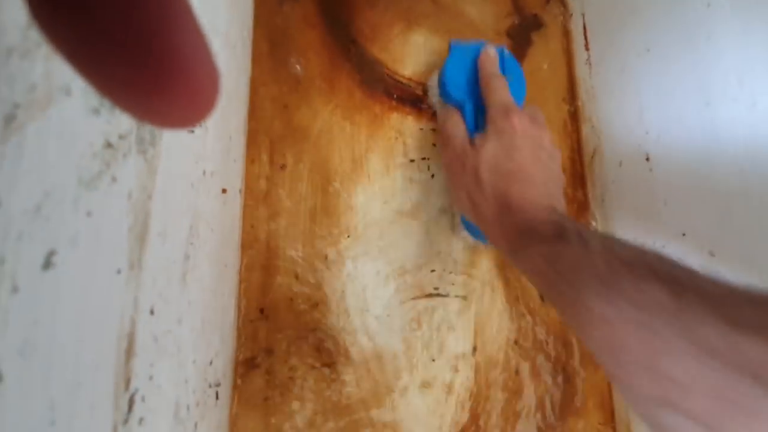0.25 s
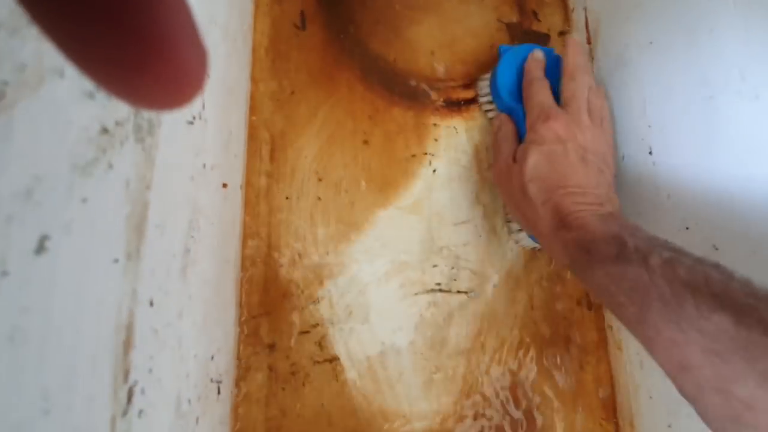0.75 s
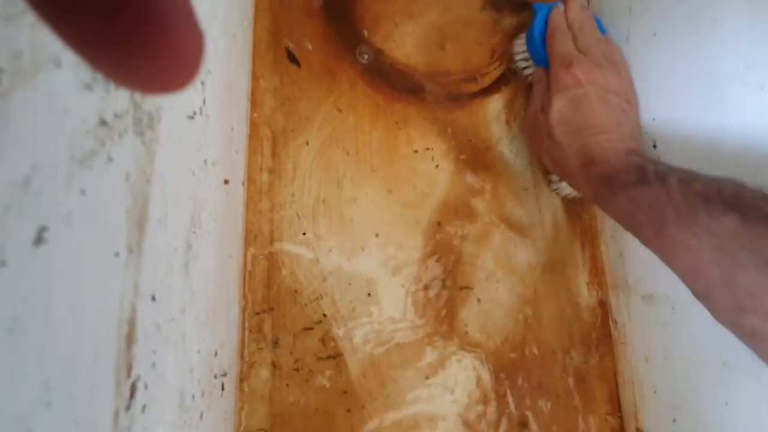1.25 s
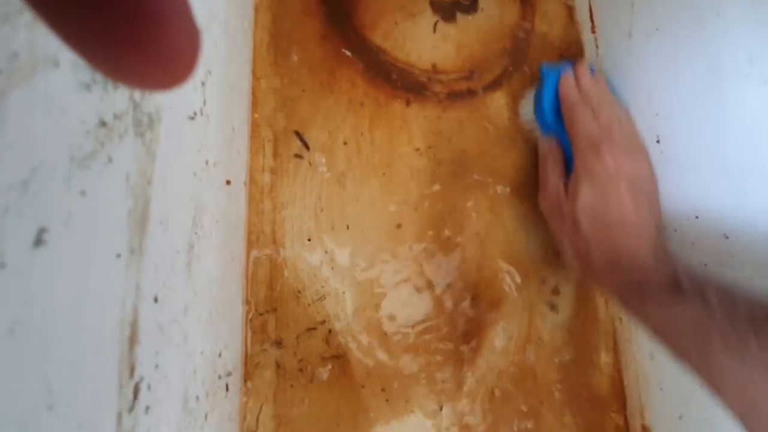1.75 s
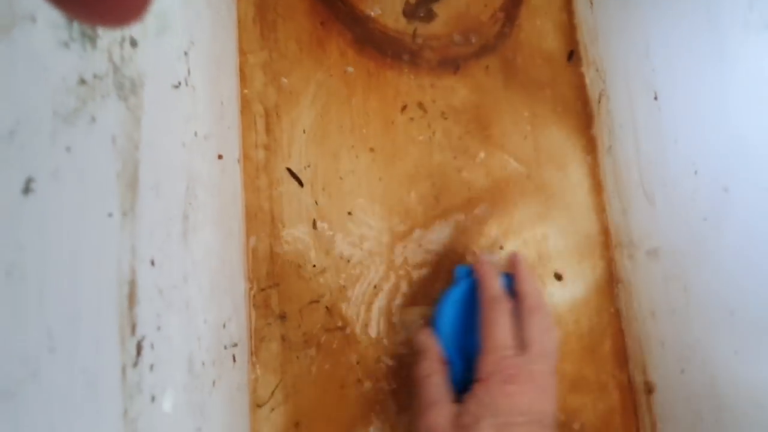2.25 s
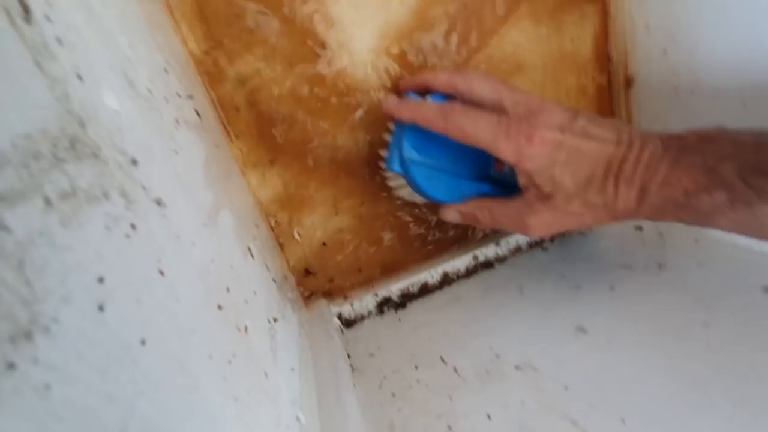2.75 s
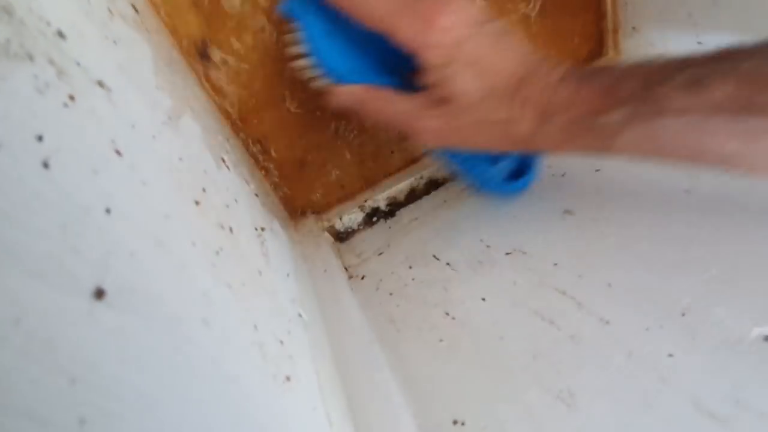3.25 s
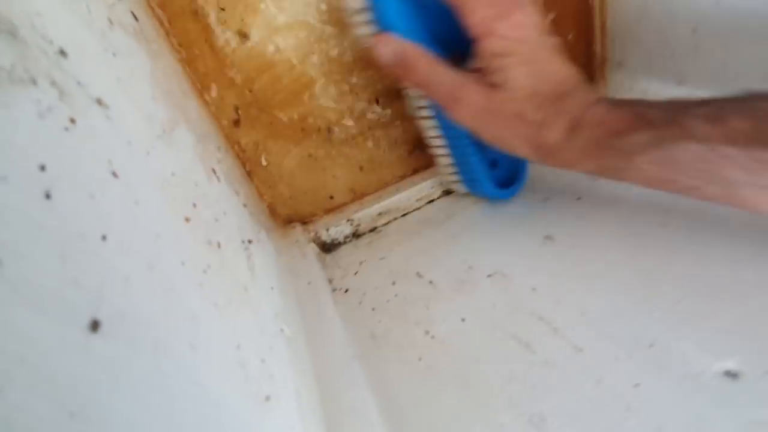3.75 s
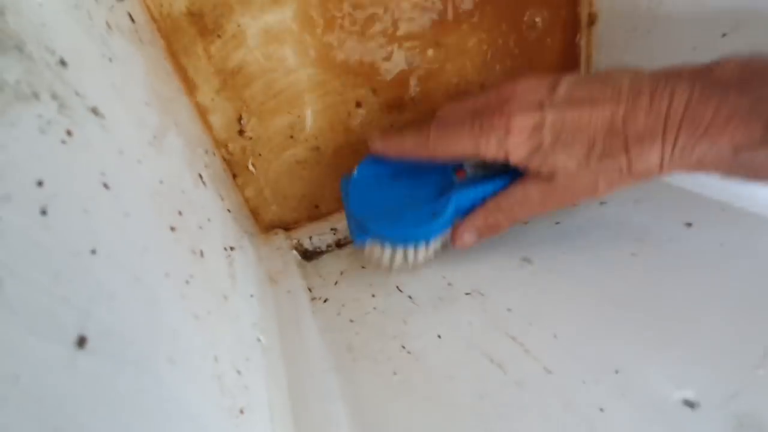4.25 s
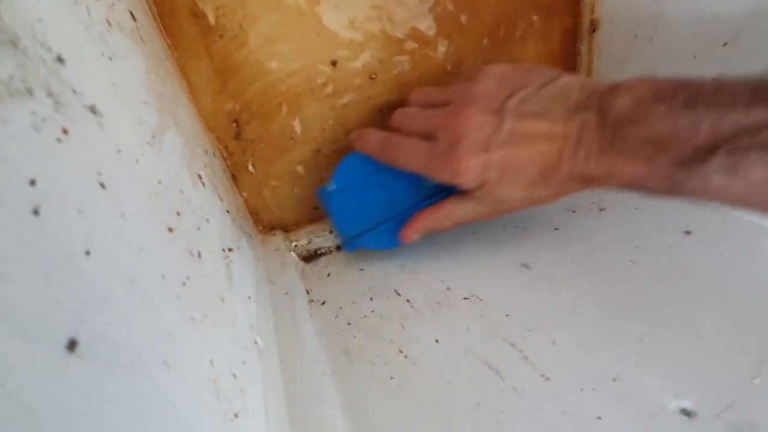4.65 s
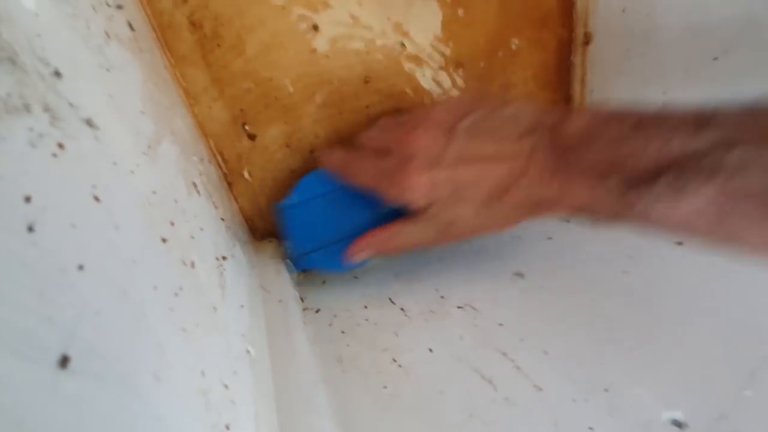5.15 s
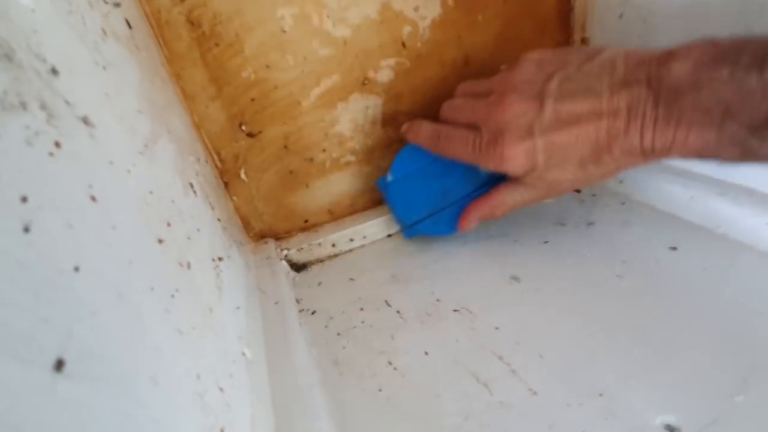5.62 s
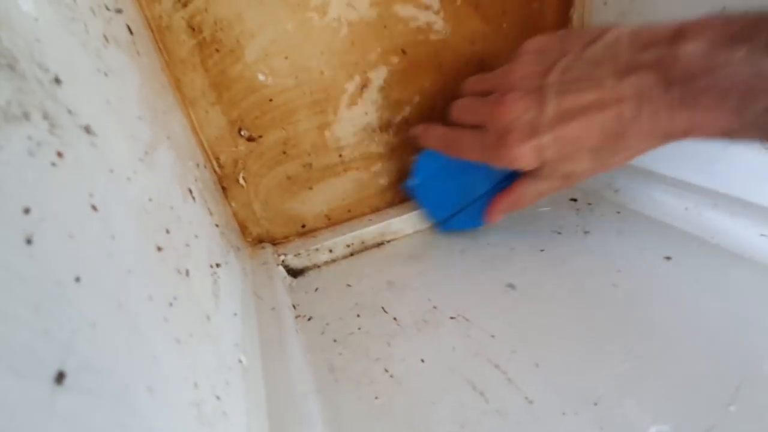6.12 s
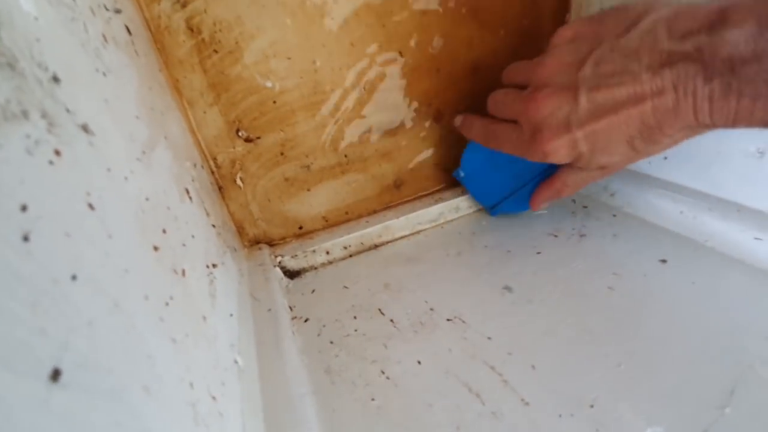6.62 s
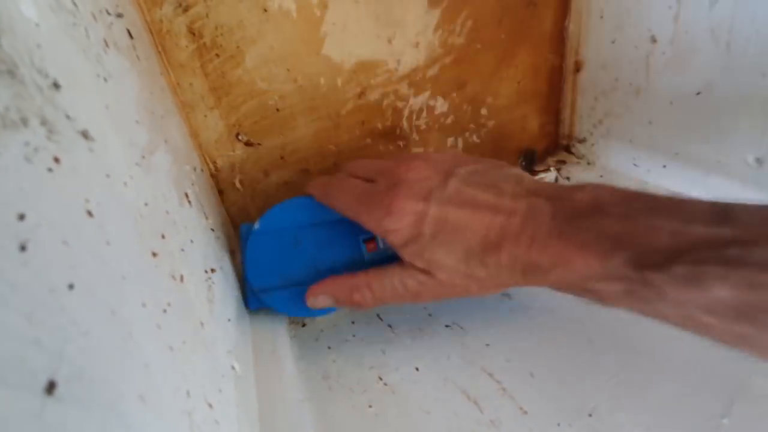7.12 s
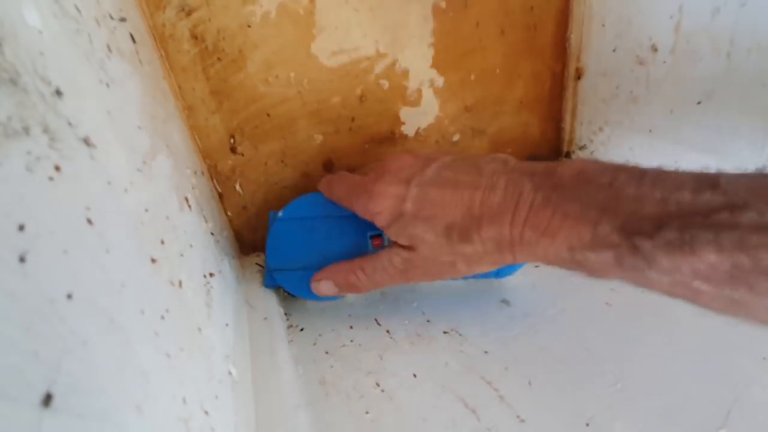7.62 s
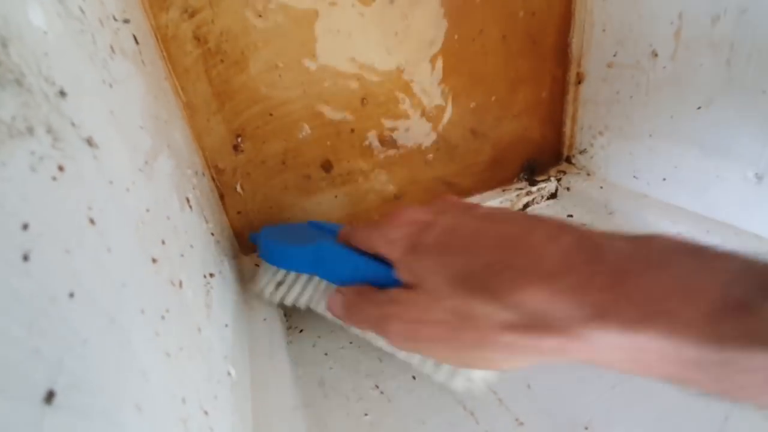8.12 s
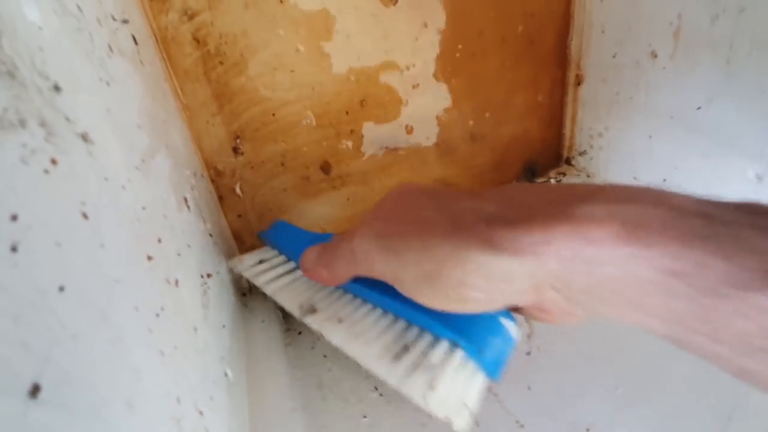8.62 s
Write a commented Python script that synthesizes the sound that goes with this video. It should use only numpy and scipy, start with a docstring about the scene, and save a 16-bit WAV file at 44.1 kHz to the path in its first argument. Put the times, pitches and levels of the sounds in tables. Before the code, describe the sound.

A stiff plastic hand brush scrubs a wet, rusty hollow basin, heard close and dry with a short small-room tail and barely any background. From 0 to 1.9 s broad strokes of about a quarter second rasp coarsely over low rumble, loudest at first, with short groans near 0.1 and 1.3 s and knocks around 1.1 and 1.5 s. The rasp almost stops just before 2 s, resumes, and from about 2.7 s moves into a corner, becoming finer and lighter, with juddering scrapes, groans and upward bristle flicks to 3.6 s. It softens around 4 s, then from 4.4 s short rapid strokes bring hiss, hollow knocks and a firm thump near 5.1 s. A momentary lift at 6.9 s ends in a sharp scrape and cluster of knocks at 7.0 s. Uneven scrubbing follows, with quick rasps and heavy thumps from 8.2 to 8.7 s.

```python
"""Fast back-and-forth rasping: a stiff plastic hand brush scrubs the wet, rusty floor of a hollow basin, heard close.
Bristles rasp as noise bursts set off by random slips; drag and knocks excite the basin's modes as rumble and thumps.
Tufts chatter and groan in trains of slips, or flick upward in pitch; a short room tail and faint noise lie behind.
The brush eases off briefly just before two seconds and lifts clear for a moment shortly before seven."""
import sys
import numpy as np
from scipy import signal
from scipy.fft import rfft, irfft, next_fast_len
from scipy.io import wavfile
from scipy.ndimage import uniform_filter1d, map_coordinates

SR = 44100
rng = np.random.default_rng(int(sys.argv[2]) if len(sys.argv) > 2 else 0)


def generate_wav(sig):
    """Save sig (samples, or channels by samples) to the path in sys.argv[1] as 16-bit PCM at SR."""
    pcm = np.round(np.clip(np.atleast_2d(sig).T, -1, 1) * 32767).astype(np.int16)
    wavfile.write(sys.argv[1], SR, pcm)


N = 391608


def amp(db):
    """Decibels to gain."""
    return 10 ** (np.asarray(db) / 20)


def unit(x):
    """Scaled to rms 1."""
    return x / np.sqrt(np.mean(x ** 2) + 1e-20)


def along(points, hz):
    """(Hz, value) points joined on a log-frequency axis."""
    f, v = np.transpose(points)
    return np.interp(np.log(hz + 1), np.log(f + 1), v)


def curves(rows):
    """One value per sample for each column after the time."""
    s, *cols = np.transpose(rows)
    return [np.interp(np.arange(N) / SR, s, c) for c in cols]


def wobble(rate_hz):
    """A smooth random curve with rate_hz knots a second."""
    knots = rng.standard_normal(4096)
    return map_coordinates(knots, [np.arange(N) * rate_hz / SR], mode="wrap")


def filtered(x, response):
    """x through a complex response of frequency, zero-padded."""
    n = x.shape[-1]
    m = 2 * next_fast_len(n // 2 + SR // 8)
    return irfft(rfft(x, m) * response(np.fft.rfftfreq(m, 1 / SR)), m)[..., :n]


def colour(points, hz):
    """Minimum-phase response with the given spectrum, by folding the cepstrum."""
    cepstrum = irfft(np.log(amp(along(points, hz))))
    half = len(cepstrum) // 2
    fold = np.r_[1, np.full(half - 1, 2), 1, np.zeros(half - 1)]
    return np.exp(rfft(cepstrum * fold))


def resonance(hz, centre_hz, width_hz):
    """One damped mode."""
    return 1j * hz * width_hz / (centre_hz ** 2 - hz ** 2 + 1j * hz * width_hz)


def lagged(x, lag_s):
    """x through a one-pole lag that rounds its corners."""
    keep = np.exp(-1 / (lag_s * SR))
    return signal.lfilter([1 - keep], [1, -keep], x)


def add(track, start_s, sound):
    """Mix a sound into a track at start_s."""
    part = track[:, max(round(start_s * SR), 0):][:, :sound.shape[-1]]
    part += sound[..., :part.shape[-1]]


def slips(rate_hz, spread_db):
    """Randomly timed stick-slip impulses of uneven size and random sign, rms 1."""
    size = amp(spread_db * np.clip(rng.standard_normal(N), -2, 2)) * rng.choice([-1, 1], N)
    fires = rng.random(N) < rate_hz / SR
    return unit(size * fires / np.sqrt(rate_hz))


def shifting(x, depth_db, size):
    """As the brush moves and bends, resonances swell and fade in patches of time and pitch."""
    z = signal.stft(x, nperseg=1024)[2]
    field = uniform_filter1d(rng.standard_normal(z.shape[1:]), size=size, axis=0)
    field = uniform_filter1d(field, size=4, axis=1)
    return unit(signal.istft(z * amp(depth_db * unit(field)), nperseg=1024)[1][:, :N])


# Brush strokes, each lasting until the next; in the faintest the brush is all but lifted.
# Each row: start in seconds, bristle hiss in relative dB, coarse rasp in relative dB,
# grip on the basin in relative dB, share of the stroke at which it is fastest (0-1).
STROKES = [(-0.096, -26.5, -28, -17.5, 0.67), (0.275, -27.5, -30, -18, 0.3), (0.488, -25, -27, -8.5, 0.46),
           (0.757, -29, -31, -28.5, 0.51), (0.982, -32.5, -32, -12.5, 0.31), (1.23, -32, -32, -24, 0.42),
           (1.457, -31.5, -30.5, -9.5, 0.53), (1.659, -33, -34, -37.5, 0.44), (1.929, -63, -59, -33, 0.76),
           (1.989, -33, -29.5, -20.5, 0.63), (2.419, -35, -37, -33.5, 0.55), (2.7, -42, -34, -31.5, 0.58),
           (2.898, -38, -38.5, -16, 0.4), (3.04, -37.5, -33.5, -38, 0.69), (3.105, -40.5, -37, -24.5, 0.58),
           (3.364, -41.5, -35.5, -16, 0.45), (3.557, -43.5, -40.5, -24.5, 0.28),
           (3.731, -53.5, -46.5, -36, 0.21), (3.926, -46.5, -46, -28, 0.43), (4.085, -61, -53.5, -33, 0.3),
           (4.212, -42, -42, -39, 0.66), (4.388, -35.5, -34.5, -36, 0.35), (4.601, -33, -32.5, -24.5, .52),
           (4.714, -34, -32.5, -30, 0.65), (4.855, -31.5, -29.5, -21.5, 0.55), (4.975, -34, -31, -29, 0.6),
           (5.072, -28.5, -27.5, -18.5, 0.64), (5.14, -45, -41, -21, 0.6),
           (5.212, -41.5, -38.5, -31.5, 0.5), (5.321, -36.5, -35.5, -22.5, 0.49),
           (5.404, -31.5, -30.5, -36.5, 0.55), (5.598, -35.5, -32.5, -26, 0.4),
           (5.701, -30, -32, -27.5, 0.58), (5.858, -35.5, -32.5, -21.5, 0.37),
           (5.998, -31.5, -31.5, -26, 0.53), (6.173, -38, -37.5, -24.5, 0.32),
           (6.297, -32, -33.5, -22, 0.52), (6.471, -44, -39.5, -25, 0.26),
           (6.614, -33.5, -34.5, -15.5, 0.36), (6.788, -40.5, -40, -29, 0.46), (6.907, -70, -75, -58, 0.7),
           (7.024, -33.5, -29.5, -23.5, 0.1), (7.252, -51, -54, -31.5, 0.15),
           (7.368, -36.5, -36.5, -20, 0.57), (7.466, -35, -36, -27, 0.61), (7.575, -39.5, -36, -21, 0.49),
           (7.769, -47, -43, -33, 0), (7.911, -36, -39, -44, 0.48), (8.091, -34, -35, -34, 0.53),
           (8.278, -32.5, -27.5, -18.5, 0.3), (8.332, -29, -33, -22.5, 0.42), (8.435, -35, -35, -23, 0.23),
           (8.51, -38, -37, -32, 0.72), (8.67, -36.5, -30.5, -17.5, 0.22), (8.729, -32.5, -29, -29.5, 0.46)]
LAST_STOP_S = 8.87
# Motion kept at a turn. Each row: time in seconds, relative share.
CREEP = [(0.25, 0.034), (0.48, 0.74), (0.74, 0.12), (2.7, 0.14), (2.9, 0.62), (3.1, 0.13)]


def strokes(cruise_s=0.18, grip_power=1.3):
    """Speed 0-1 and the gains of hiss, rasp and grip per sample; speed falls to rest at each turn."""
    start_s, hiss_db, rasp_db, grip_db, fastest = np.transpose(STROKES)
    turns_s, t = np.maximum.accumulate(np.r_[start_s, LAST_STOP_S]), np.arange(N) / SR
    progress = np.interp(t, turns_s, np.arange(len(turns_s)))
    k = np.minimum(progress.astype(int), len(start_s) - 1)
    warp = np.log(.5) / np.log(np.clip(fastest, .05, .95))
    swing = np.abs(np.sin(np.pi * (progress - k) ** warp[k]))
    # long strokes reach a cruising speed and hold it; short ones only swing
    cruise = np.maximum(np.diff(turns_s) / cruise_s, .5)[k]
    speed = np.tanh(cruise * swing ** 1.274) / np.tanh(cruise)
    middle_s = (turns_s[1:] + turns_s[:-1]) / 2

    def level(db, motion, creep):
        """Gain from motion, plus the creep of bent bristles that persists at a turn."""
        return amp(db[k]) * motion + creep * amp(np.interp(t, middle_s, db))

    creep, = curves(CREEP)
    hiss = level(hiss_db, speed, 0.62 * creep)
    rasp = level(rasp_db, speed, 0.67 * creep)
    grip = level(grip_db, 0.73 * speed ** grip_power, 0.28)
    return speed, hiss, rasp, grip


CORNER_S = 2.66  # the brush moves from the open floor into a corner


def cornered():
    """0 on the open floor, 1 in the corner."""
    return .5 + .5 * np.tanh((np.arange(N) / SR - CORNER_S) / .15)


def bristles(spectrum, rate_hz, spread_db, smooth, patchy_db, ring_s):
    """Bristle tips catch and let go, each with a tiny noise burst that differs from port to port."""
    energy = signal.lfilter([1], [1, -np.exp(-1 / (ring_s * SR))], slips(rate_hz, spread_db) ** 2)
    envelope = np.sqrt(energy / energy.mean() + smooth ** 2)
    ticks = shifting(envelope * rng.standard_normal((2, N)), patchy_db, size=4)
    return np.sqrt(2) * unit(filtered(ticks, lambda hz: colour(spectrum, hz)))


# Bristle spectra: fine hiss, coarse rasp. Each row: frequency in Hz, relative level in dB.
HISS = [(2500, -35), (4500, -15), (6000, -1.5), (8500, 1), (10800, -2.5), (15500, -4.5)]
RASP = [(450, -13.5), (800, -3), (1700, 2.5), (3500, 3), (6500, -3.5), (12000, -60)]


def scrubbing(tip_db=11.5, tuft_hz=3300, tuft_width_hz=2600, tuft_db=3.5,
              slow_hz=2100, fast_hz=3400, sweep=0.4):
    """Faster strokes release more bristles a second; whole tufts catch together and roughen the sound."""
    speed, hiss_gain, rasp_gain, _ = strokes()
    tufts, tilt = wobble(180), cornered() - .5
    hiss = bristles(HISS, 6000 * (speed + .2), spread_db=4.0, smooth=.65, patchy_db=1.1, ring_s=.0004)
    rasp = bristles(RASP, 2000 * (speed + 0.32), spread_db=5.0, smooth=.8, patchy_db=3.0, ring_s=0.0013)
    # tilted into the corner the brush runs on its tips and sounds finer; flat on the floor whole tufts sing
    tips = filtered(hiss, lambda hz: 1 - 1 / (1 + (hz / 10500) ** 4))
    hiss = hiss + tips * (amp(tip_db * tilt) - 1)
    singing = filtered(rasp, lambda hz: resonance(hz, tuft_hz, tuft_width_hz))
    rasp = rasp + singing * (amp(-tuft_db * tilt) - 1)
    # tuft ring climbs as the stroke gathers speed and falls toward the turn
    slow_ring = filtered(rasp, lambda hz: resonance(hz, slow_hz, slow_hz / 4))
    fast_ring = filtered(rasp, lambda hz: resonance(hz, fast_hz, fast_hz / 4))
    ring = slow_ring * (1 - speed ** 2) + fast_ring * speed ** 2
    rasp = (rasp + sweep * ring) / np.sqrt(1 + sweep / 2)
    return (hiss * hiss_gain + rasp * rasp_gain) * amp(3.0 + 1.0 * tufts)


# Basin modes. Each row: frequency in Hz, width in Hz, relative level in dB,
# phase between the microphone ports in rad.
BASIN = [(67.2, 9.2, 5, -0.5), (109.7, 9.4, 3.5, -0.46), (145, 24.4, 8, -0.2), (244.9, 16, 0, 0.3),
         (295, 37.4, 2, -0.1), (383, 32.4, 4.5, 0.12), (414.4, 9.8, 5, -0.7), (504, 26, -5.5, 1.97),
         (608, 37, 0.5, -1.63), (678, 55, 4, 0.22), (963, 135, 1.5, 1.8), (1215, 35, 10.5, 3.5),
         (1550, 61, 8, -1.7), (1748, 23, 16, 2.1), (2103, 270, 5.5, -3.9)]


def basin(hz, scatter_db):
    """The basin's ring at both ports; the place of contact, drawn per call, sets each mode's strength."""
    luck = rng.standard_normal(len(BASIN))
    ports = np.array([[.5j], [-.5j]])
    return sum(amp(db + scatter_db * z) * np.exp(ports * phase) * resonance(hz, centre_hz, width_hz)
               for (centre_hz, width_hz, db, phase), z in zip(BASIN, luck))


# Weight of the arm on the brush, setting the deep rumble. Each row: time in seconds, relative level in dB.
WEIGHT = [(0, -24.5), (0.25, 6), (0.47, -26), (0.68, -8.5), (0.9, -20.5), (1.14, -10), (1.36, -20),
          (2.1, -13.5), (2.95, -18.5), (3.55, -11.5), (4.4, -22), (6.65, -21.5), (7.45, -14.5), (8, -27),
          (8.6, -21)]
RUMBLE_LAG_S, JUDDER_LAG_S = 0.022, 0.0046  # how slowly each builds and fades
RUMBLE_PER_GRIP, RUMBLE_PER_RASP = 0.47, 0.19  # dB per dB


def drag():
    """Rumble and judder in dB: judder follows the grip; rumble swells slowly with grip, rasp and weight."""
    _, _, rasp, grip = strokes()
    weight_db, = curves(WEIGHT)

    def follow_db(gain, lag_s):
        """Lagged gain in dB."""
        return 20 * np.log10(lagged(gain, lag_s) + 1e-6)

    rumble_db = weight_db + RUMBLE_PER_GRIP * follow_db(grip, RUMBLE_LAG_S)
    rumble_db = rumble_db + RUMBLE_PER_RASP * follow_db(rasp, RUMBLE_LAG_S)
    return rumble_db, follow_db(grip, JUDDER_LAG_S)


# Drag force spectra into the basin: rumble, judder; FLOOR is the open-floor sound.
# Each row: frequency in Hz, relative level in dB.
RUMBLE = [(25, -55), (70, 1.5), (170, -6.5), (230, 0.5), (400, -23.5), (1000, -85)]
JUDDER = [(100, -13.5), (260, 8), (400, 4), (700, 1), (1100, -3), (2000, -19)]
FLOOR = [(35, -36), (70, 9), (180, 4.5), (240, -5), (510, -2), (680, -13.5), (2500, -27)]


def dragging():
    """Friction slips shake the basin into broad rumble and ringing judder; the open floor adds a low sound."""
    rumble_db, judder_db = drag()
    corner = cornered()

    def shake(force, spectrum):
        """Basin ring under a coloured force."""
        return filtered(force, lambda hz: basin(hz, scatter_db=0) * colour(spectrum, hz))

    rumble = shifting(shake(slips(900, spread_db=3.0), RUMBLE), depth_db=4.0, size=2)
    rumble = rumble * amp(rumble_db + 8.5)
    judder = shifting(shake(slips(700, spread_db=0.5), JUDDER), depth_db=5.0, size=3)
    judder = judder * amp(judder_db - 3.0 + 2.74 * wobble(35))
    floor = unit(filtered(slips(1200, spread_db=3.0), lambda hz: colour(FLOOR, hz)))
    floor = floor * amp((rumble_db + judder_db) / 2 - 1.5)
    # hard chatter also rattles the plastic back of the brush
    rattle = bristles(CLACK, 200, spread_db=2.5, smooth=.3, patchy_db=3.5, ring_s=.003)
    rattle = rattle * amp(1.4 * judder_db - 12.0)
    return (rumble + judder + rattle) * (0.33 + 0.59 * corner) + floor * np.sqrt(1 - corner)


def plastic(hz, spectrum, ring_db=5, width_hz=130):
    """Colour of the brush's plastic back; its few resonances shift with each new grip and contact."""
    centres_hz = rng.uniform(900, 3300, 4)
    ring = sum(resonance(hz, centre_hz, width_hz) for centre_hz in centres_hz)
    return colour(spectrum, hz) * (1 + amp(ring_db) * ring)


# Tufts catch on an edge and chatter across it. Each row: start in seconds, length in seconds,
# basin judder in dB, bristle scratch in dB.
SCRAPES = [(1.996, 0.055, -29.5, -35.5), (2.855, 0.053, -26, -29), (3.202, 0.1, -21.5, -31.5),
           (3.366, 0.15, -19.5, -31), (3.94, 0.046, -28, -46), (4.226, 0.16, -29.5, -37.5),
           (4.394, 0.024, -31, -21.5), (5.35, 0.048, -32, -23), (5.413, 0.039, -23.5, -34.5),
           (6.379, 0.051, -19.5, -44), (7.036, 0.043, -16.5, -23.5), (7.592, 0.054, -23, -23),
           (7.924, 0.021, -27.5, -30), (8.065, 0.066, -20.5, -27.5)]
# Scratch spectrum. Each row: frequency in Hz, relative level in dB.
SCRATCH = [(400, -9), (900, -13), (1900, 1), (3200, -5), (15000, -11)]


def scrapes(slip_hz=260, uneven=.4, spread_db=0.5, edge_s=0.0077, stop_s=0.013):
    """Tufts slip unevenly; each slip scratches and jolts the basin, which the pressing brush soon damps."""
    out, t = np.zeros((2, N)), np.arange(SR // 4) / SR
    for start_s, length_s, judder_db, scratch_db in SCRAPES:
        gap, size, clump = rng.standard_normal((3, 128))
        at_s = np.cumsum(np.exp(uneven * gap)) / slip_hz
        at_s -= at_s[0]
        # each row of tufts catches with its own force
        rows_db = np.interp(at_s * 45, np.arange(len(clump)), np.clip(3 * clump, -5, 5))
        press = np.clip((length_s - at_s) / edge_s, 0, 1) * amp(rows_db)
        force = amp(spread_db * np.clip(size, -2, 2)) * press
        jolts = np.bincount((at_s * SR).astype(int), force, len(t))[:len(t)]
        judder = filtered(jolts, lambda hz: basin(hz, scatter_db=0.5) * colour(JUDDER, hz))
        judder /= 1 + (np.maximum(t - length_s, 0) / stop_s) ** 2
        bursts = lagged(jolts ** 2, .002) * rng.standard_normal((2, len(t)))
        scratch = filtered(bursts, lambda hz: plastic(hz, SCRATCH))
        scrape = amp(judder_db) * unit(judder) + amp(scratch_db) * unit(scratch)
        add(out, start_s, scrape * np.sqrt(length_s / t[-1]))
    return out


# Tufts slip in step under a hard push. Each row: start in seconds, length in seconds,
# level in dB, initial slip rate in Hz.
GROANS = [(0.083, .075, -19.5, 427), (0.176, 0.11, -20, 536), (1.293, 0.084, -27.5, 295.6),
          (3.114, 0.063, -19.5, 432), (3.198, 0.079, -19.5, 431), (3.404, 0.028, -16, 436),
          (3.447, 0.067, -22, 368), (5.882, 0.054, -19.5, 404.7)]


def groans(sag=.16, edge_s=0.0083, stop_s=0.0081):
    """Pressed hard, tufts slip in step and the basin groans; slips slow as the brush loses speed."""
    out, t = np.zeros((2, N)), np.arange(SR // 5) / SR
    for start_s, length_s, db, slip_hz in GROANS:
        gap, size = rng.standard_normal((2, 128))
        slowing = 1 + sag * np.arange(len(gap)) / (length_s * slip_hz)
        gaps_s = slowing * np.exp(.1 * gap) / slip_hz
        at_s = np.cumsum(gaps_s) - gaps_s[0]
        press = np.clip(np.minimum(at_s + gaps_s, length_s - at_s) / edge_s, 0, 1) * amp(3 * size)
        jolts = np.bincount((at_s * SR).astype(int), press, len(t))[:len(t)]
        groan = filtered(jolts, lambda hz: basin(hz, scatter_db=2) * colour(JUDDER, hz))
        groan /= 1 + (np.maximum(t - length_s, 0) / stop_s) ** 2
        add(out, start_s, amp(db) * unit(groan) * np.sqrt(length_s / t[-1]))
    return out


# Brush head against a wall. Each row: time in seconds, knock in relative dB,
# heavy thump in relative dB, plastic clack in relative dB.
KNOCKS = [(1.051, -2, -28, -9), (1.08, -2.5, -28, -23.5), (1.127, -17, -9, -18), (1.533, -5.5, -20, -12.5),
          (2.93, -7, -40, -16.5), (3.094, -1, -13, -50), (3.506, -5, -11, -18), (3.533, -12, -14, -45),
          (3.734, -6.5, -14.5, -25.5), (3.961, -11.5, -28, -20), (4.037, -12, -37, -26.5),
          (4.232, -10.5, -55, -25.5), (4.255, -5, -48, -22.5), (4.321, -8.5, -51, -27.5),
          (4.411, -6, -40, -9), (4.692, -3.5, -6, -38.5), (4.937, -5.5, -52, -15), (4.95, -12, -7, -32),
          (5.126, -2, -2, -18), (5.943, -5, -14, -31), (6.127, -4.5, -27, -40.5), (6.184, -10, -24, -45),
          (6.222, -2, -33.5, -44.5), (6.351, -1, -15, -22.5), (6.402, -6.5, -17, -31),
          (6.548, -4.5, -18, -48.5), (7.029, -3.5, -32, -13), (7.054, -2, -24, -17.5),
          (7.082, -2.5, -15.5, -31), (7.168, -30, -14.5, -13.5), (7.287, -5, -11.5, -15),
          (7.447, -3.5, -8, -23.5), (7.654, -7.5, -15.5, -60), (7.944, -0.5, -16, -13.5),
          (8.029, 0, -23.5, -12), (8.241, -8.5, -2.5, -21.5), (8.359, -13, -18, -15.5),
          (8.47, -5, 0.5, -27.5), (8.689, -6, -2.5, -24.5)]
# Blow spectra: knock on the basin, plastic clack. Each row: frequency in Hz, relative level in dB.
KNOCK = [(60, -37), (170, -14), (280, 5), (430, 1), (750, -4.5), (1200, -17.5)]
CLACK = [(300, -25.5), (700, 5), (1250, 1.5), (2000, 3), (3200, -9.5), (4400, -14), (15000, -39)]


def knocks(hard_hz=2300, db_per_octave=18, weight_dulls=0.44,
           thump_hz=144, glide_hz=160, glide_s=0.0044, push_s=0.0128, damp_s=0.12, lag_s=0.003,
           clack_t60_s=0.084, free_s=0.17, held_db=-6, skid_hz=590, slowing=1.1):
    """The hard head clacks and rings the basin; the weight of the arm follows as a slow, deep thump."""
    out, t = np.zeros((2, N)), np.arange(SR // 4) / SR
    nth = np.arange(1, 6)
    # the push starts high and sinks as the tufts give way
    sag = glide_hz * glide_s * (1 - np.exp(-t / glide_s))
    push = np.sin(2 * np.pi * (thump_hz * t + sag)) * np.sin(np.pi * np.minimum(t / push_s, 1))
    clack_envelope = amp(-60 * t / clack_t60_s) * (1 - np.exp(-t / 0.00063))

    def peak_one(x):
        """Scaled to peak 1."""
        return x / np.abs(x).max()

    for start_s, knock_db, thump_db, clack_db in KNOCKS:
        # bare plastic makes a blow bright; with weight behind it the tufts cushion it and it is dull
        cushion_hz = hard_hz * 2 ** ((clack_db - weight_dulls * thump_db) / db_per_octave)
        # the head skids to a stop in a few slowing catches, so every blow swells briefly
        catch_hz = skid_hz * (cushion_hz / hard_hz) ** .3
        gaps_s = slowing ** (nth - 1) * np.exp(.3 * rng.standard_normal(len(nth))) / catch_hz
        at = ((np.cumsum(gaps_s) - gaps_s[0]) * SR).astype(int)
        landing = np.bincount(at, nth * np.exp(-nth), len(t))
        knock = filtered(landing, lambda hz: basin(hz, scatter_db=5.0) * colour(KNOCK, hz)
                         / (1 + 1j * hz / cushion_hz) ** 2)
        # rings freely only until the tufts lie flat
        knock *= amp(held_db * (1 - np.exp(-(t / free_s) ** 2)))
        # the pressing brush damps the thump
        thump = filtered(push, lambda hz: basin(hz, scatter_db=2.5)) / (1 + (t / damp_s) ** 4)
        burst = rng.standard_normal((2, len(t))) * clack_envelope
        clack = filtered(burst, lambda hz: plastic(hz, CLACK))
        add(out, start_s, amp(knock_db) * peak_one(knock) + amp(clack_db + 3.5) * peak_one(clack))
        add(out, start_s + lag_s, amp(thump_db) * peak_one(thump))
    return out


# A bent tuft drags and springs free. Each row: start in seconds, length in seconds,
# level in dB, middle pitch in Hz.
FLICKS = [(2.771, 0.067, -30, 2580), (2.935, 0.032, -23, 2140), (2.944, 0.019, -20.5, 8500),
          (3.058, 0.017, -28, 9600), (3.079, 0.018, -22.5, 13200), (3.633, 0.081, -33.5, 3080),
          (6.696, 0.018, -14, 2160), (7.399, 0.024, -22, 1280), (8.75, 0.089, -24.5, 11200),
          (8.82, 0.023, -19.5, 1740)]


def flicks(rise_octaves=0.47, sharpness=5):
    """A bent tuft zips upward in pitch as it straightens: resonant noise read at a rising speed."""
    out, t = np.zeros((2, N)), np.arange(SR // 8) / SR
    for start_s, length_s, db, pitch_hz in FLICKS:
        done = np.minimum(t / length_s, 1)
        noise = rng.standard_normal((2, len(t)))
        ring = filtered(noise, lambda hz: resonance(hz, pitch_hz, pitch_hz / sharpness))
        clock = np.cumsum(2 ** (rise_octaves * (done - .5)))
        flick = np.array([map_coordinates(port, [clock]) for port in ring]) * np.sin(np.pi * done)
        add(out, start_s, amp(db) * unit(flick) * np.sqrt(length_s / t[-1]))
    return out


# Room decay. Each row: frequency in Hz, t60 in seconds.
ROOM = [(100, 0.0067), (500, 0.27), (3000, 0.36), (12000, 0.11)]


def room(x):
    """A small hard room answers with decaying noise that lasts longest in the upper mids."""
    hz, t, z = signal.stft(rng.standard_normal((2, SR // 2)), SR, nperseg=256)
    decay = amp(-60 * t / along(ROOM, hz)[:, None])
    tail = signal.istft(z * decay, SR, nperseg=256)[1]
    return signal.fftconvolve(x, tail / np.linalg.norm(tail[0]), axes=1)[:, :N]


def background():
    """Steady noise, darkened above 800 Hz, rms 1."""
    return unit(filtered(rng.standard_normal((2, N)), lambda hz: 1 / (1 + hz / 800)))


def scene():
    """Brush and basin in the room, over a faint background."""
    brush = scrubbing() + dragging() + scrapes() + groans() + knocks() + flicks()
    return brush + amp(-15.0) * room(brush) + amp(-80) * background()


# Balance of the ports. Each row: frequency in Hz, left minus right in dB.
LEAN = [(100, 0), (500, 1.8), (1100, 4.5), (2000, 1.3), (5000, 0)]
TOP_HZ = 15980


def record(dry):
    """The left port hears a little more midrange; peaks round off at full scale; the top band is cut."""
    x = filtered(dry, lambda hz: amp(np.array([[.5], [-.5]]) * along(LEAN, hz)))
    x = x / (1 + np.abs(x) ** 8) ** (1 / 8)
    return filtered(x, lambda hz: hz < TOP_HZ)


dry = scene()
out = record(dry)
generate_wav(out)
```